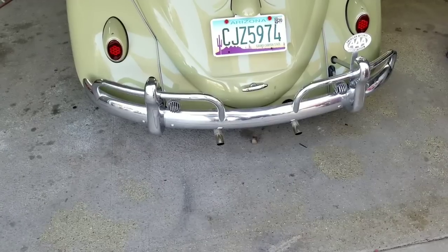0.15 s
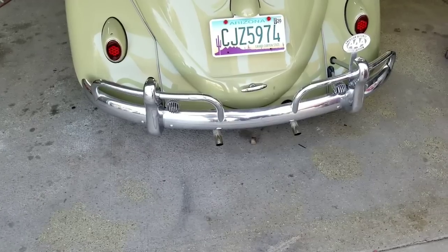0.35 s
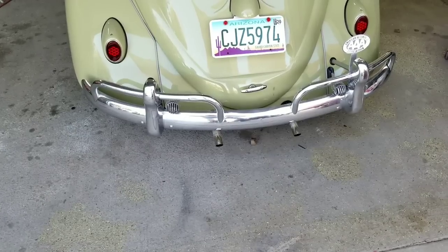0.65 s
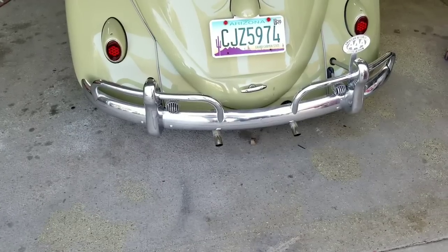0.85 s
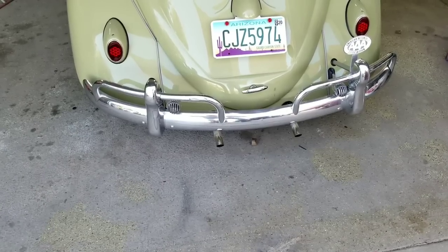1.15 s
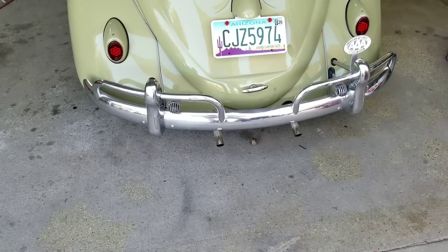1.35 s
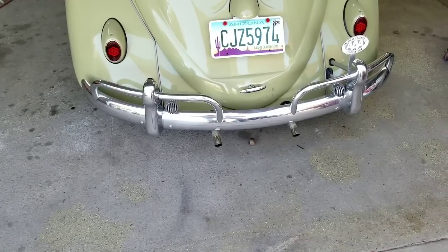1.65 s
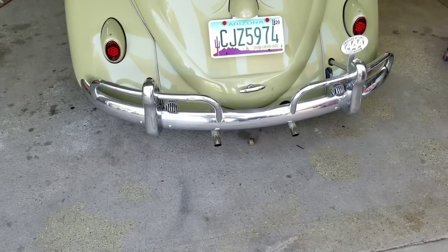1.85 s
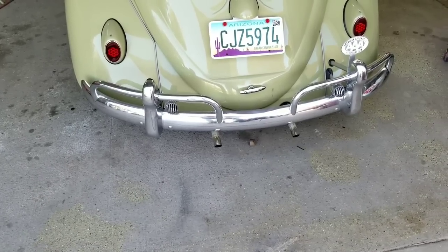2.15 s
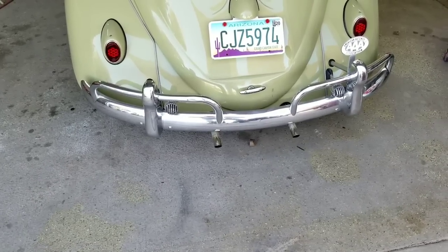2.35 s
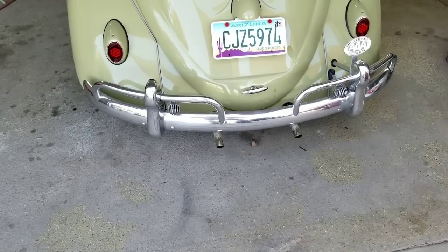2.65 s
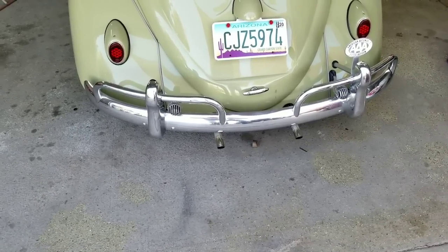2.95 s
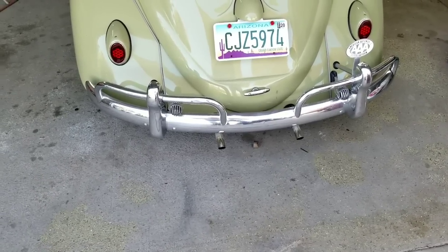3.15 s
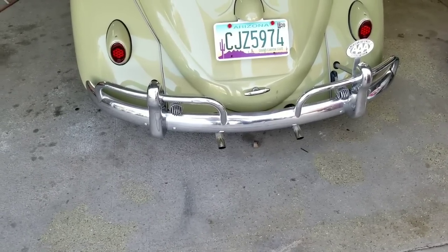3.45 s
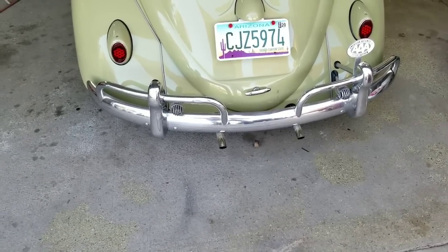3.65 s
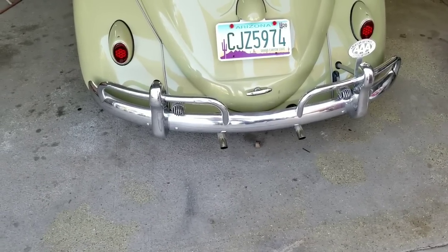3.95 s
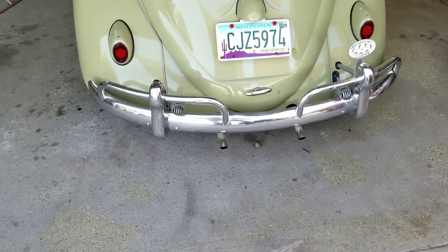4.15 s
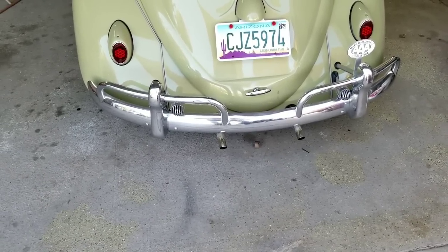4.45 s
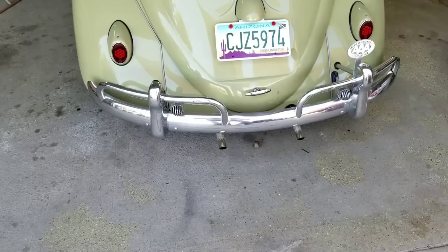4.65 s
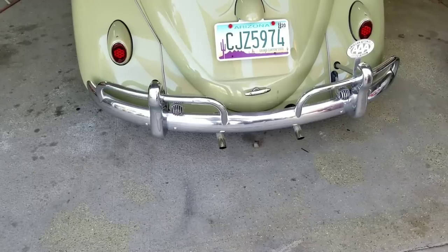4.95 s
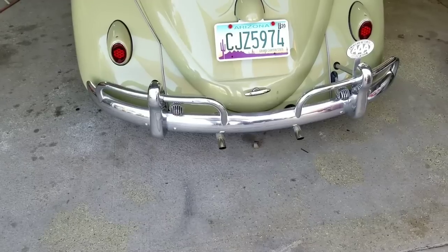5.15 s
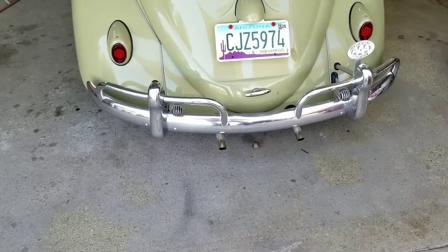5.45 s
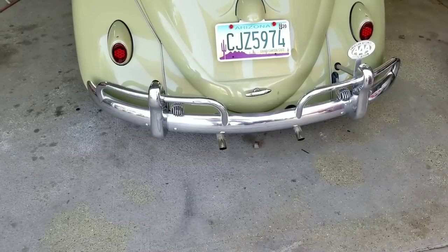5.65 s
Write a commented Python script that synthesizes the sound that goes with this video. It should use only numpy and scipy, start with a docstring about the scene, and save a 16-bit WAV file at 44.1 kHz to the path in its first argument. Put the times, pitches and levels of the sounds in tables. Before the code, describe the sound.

An air-cooled car engine idles in a garage, slows and sputters almost to a stall, coughs once, then catches again unevenly.

```python
"""Flat-four nearly stalling in a garage

An air-cooled engine runs off the throttle, heard from behind its two tailpipes. It slows, misfires,
nearly stalls, coughs once with a hollow pop and catches again unevenly. Every firing is a low thump,
a knock in the silencer and a whistling puff of gas; while it runs evenly the thumps merge into a drone.
The garage answers, and the cooling fan and valve gear rush underneath."""
import sys
import numpy as np
from scipy import signal
from scipy.fft import rfft, irfft, next_fast_len
from scipy.io import wavfile

SR = 44100
rng = np.random.default_rng(int(sys.argv[2]) if len(sys.argv) > 2 else 0)


def persist_wave(psi):
    """Save psi, clipped to +-1, as 16-bit WAV."""
    counts = np.round(np.clip(psi, -1, 1) * 32767).astype(np.int16)
    wavfile.write(sys.argv[1], SR, np.atleast_2d(counts).T)


N = 255320
TIME = np.arange(N) / SR
EVEN_UNTIL_S = 2.57  # the engine runs rough from here on

# engine speed: (time [s], rate [firings/s])
FIRING_RATE = [(0.0, 44.45), (0.39, 42.47), (0.79, 42.92), (1.4, 41.44), (1.88, 37.92), (2.4, 35.76),
               (2.62, 33.61), (2.93, 31.67), (3.46, 29.34), (3.76, 24.8), (4.12, 18.75), (4.42, 13.64),
               (4.5, 18.32), (4.7, 20.36), (4.95, 41.32), (5.02, 48.64), (5.1, 40.4), (5.18, 49.43),
               (5.4, 40.33), (5.61, 35.74), (5.79, 35.88)]
# strength of the burn: (time [s], level [dB])
POWER = [(0, 0), (2.3, 0.5), (3.0, -2), (3.8, -6.5), (4.3, -11), (4.72, -9.5), (4.95, -6), (5.25, -8.5),
         (5.79, -7.5)]


def from_db(db):
    """Decibels to gain."""
    return 10 ** (np.asarray(db) / 20)


def at_hz(points, hz):
    """Read a spectrum on a log-frequency axis."""
    known, values = np.transpose(points)
    return np.interp(np.log(hz + 1e-6), np.log(known), values)


def in_time(rows, at):
    """Read a curve at the given times."""
    return np.interp(at, *np.transpose(rows))


def pan(db):
    """Left and right gains for a level difference."""
    return from_db(np.array([[db], [-db]]) / 2)


def stereo_noise(alike, size=N):
    """White noise whose two sides are partly alike."""
    mid, side = rng.standard_normal((2, size))
    return (np.sqrt(1 + alike) * mid + np.sqrt(1 - alike) * side * [[1], [-1]]) / np.sqrt(2)


def coloured(x, spectrum):
    """Shape a white signal, keeping its power."""
    size = next_fast_len(N + SR // 10)
    gain = from_db(at_hz(spectrum, np.arange(size // 2 + 1) * SR / size))
    return irfft(rfft(x, size) * gain / np.sqrt(np.mean(gain ** 2)), size)[..., :N]


def resonance(x, hz, width_hz):
    """Two-pole resonance, gain 1 at its peak."""
    r = np.exp(-np.pi * width_hz / SR)
    feedback = [1, -2 * r * np.cos(2 * np.pi * hz / SR), r * r]
    return signal.lfilter(np.array([1, 0, -1]) * (1 - r * r) / 2, feedback, x + 1e-18)


def low_ring(spectrum, cutoff_hz=700):
    """The minimum-phase ring of a spectrum, low-passed and scaled to a peak of 1."""
    size = SR // 2
    gain = from_db(at_hz(spectrum, np.arange(size // 2 + 1) * SR / size))
    cepstrum = irfft(np.log(gain), size)
    cepstrum[1:size // 2] *= 2
    cepstrum[size // 2 + 1:] = 0
    ring = irfft(np.exp(rfft(cepstrum)), size)
    ring = signal.sosfilt(signal.butter(2, cutoff_hz, fs=SR, output="sos"), ring)
    return ring / np.abs(ring).max()


def delayed(x, s):
    """The same sound, later."""
    return np.interp(TIME - s, TIME, x, left=0)


def swells(times, gains, rise_s, fall_s):
    """One smooth swell per event: a bell-curve attack and an exponential tail."""
    out = np.zeros(N)
    for s, gain in zip(times, gains):
        near = slice(*np.searchsorted(TIME, [s - 4 * rise_s, s + 10 * fall_s]))
        age = TIME[near] - s
        log_envelope = np.where(age < 0, -.5 * (age / rise_s) ** 2, 1 - np.hypot(1, age / fall_s))
        out[near] += gain * np.exp(log_envelope)
    return out


def clicks(times, gains):
    """One click per event."""
    out = np.zeros(N)
    np.add.at(out, np.clip(np.round(times * SR).astype(int), 0, N - 1), gains)
    return out


def firing_count(start_phase=.614):
    """Firings so far; there are two to each turn of the crank."""
    return start_phase + np.cumsum(in_time(FIRING_RATE, TIME)) / SR


def firings(merged_thump_db=-37, misfire_db=-27, rasp_per_power=0.14):
    """The four cylinders take turns, some missing: times, then thump, knock, rasp and hiss in dB."""
    # the cylinders in firing order:
    # (lag [s], thump [dB], knock [dB], rasp [dB], hiss [dB], knock lost in rough running [dB])
    cylinders = [(.0002, -25.5, -32, -23.5, -18, 13), (.0002, -20.5, -22.5, -25, -21.5, 2.5),
                 (.00015, -21, -29.5, -23.5, -19, 5.5), (-.0006, -21.5, -27.5, -22, -18, 1.5)]
    # gas pressure at the valves, driving knock, rasp and hiss: (time [s], level [dB])
    pressure = [(0, -2.5), (1, -1.4), (1.6, -3), (2.3, -2.5), (2.9, 1), (3.5, -0.5), (3.88, -3), (4.1, -1),
                (4.5, -1), (4.92, 0), (5.18, -1.5), (5.38, -6), (5.79, -7)]
    # charges that burn harder or softer than their neighbours: (time [s], knock [dB], rasp [dB], hiss [dB])
    odd_burns = [(2.352, -7, 0, 3.5), (2.582, -4, -11, -13), (2.734, 1, -1.5, 4), (3.443, -8, 0, 6.5),
                 (3.478, -9, -1, 5.5), (3.584, 0, -2, 8.5), (3.814, -6, -2, -4), (3.95, 2, -7.5, -4.5),
                 (3.996, -8, 2.5, -0.5), (4.327, 1, 3.5, -3.5), (4.466, -11, 3.5, 1), (4.895, 5, 2.5, 2),
                 (4.946, 5, 5, 5), (5.171, 11, 1, 6), (5.211, 0, -6, -2), (5.391, -4, -4.5, -6)]
    # the mixture fails to light: (time [s], misses in a row [firings])
    misfires = [(2.83, 1), (3.01, 1), (3.08, 1), (3.27, 1), (3.34, 1), (3.55, 1), (3.62, 1), (3.77, 1),
                (3.9, 1), (4.05, 1), (4.15, 3), (4.39, 1), (4.57, 2), (5.06, 3), (5.23, 1), (5.28, 5),
                (5.52, 1), (5.57, 1)]
    beats = TIME[np.flatnonzero(np.diff(np.floor(firing_count())))]
    turn = np.arange(len(beats)) % len(cylinders)
    lag, thump, knock, rasp, hiss, knock_loss = np.array(cylinders)[turn].T
    rough = beats > EVEN_UNTIL_S
    power = in_time(POWER, beats)
    thump = np.where(rough, thump + power, merged_thump_db)
    rasp = rasp + rasp_per_power * power  # a weak burn rasps less
    gas = np.transpose([knock - rough * knock_loss, rasp, hiss]) + in_time(pressure, beats)[:, None]
    gas += rng.standard_normal(gas.shape) * (1.54, 1.56, 0.7)  # no two burns are alike
    for s, *change_db in odd_burns:
        gas[np.abs(beats - s).argmin()] += change_db
    levels = np.column_stack([thump, gas])
    for s, count in misfires:
        first = np.abs(beats - s).argmin()
        levels[first:first + count] += misfire_db  # an unlit cylinder only pumps air
    return beats + lag, *levels.T


def drone(bass_lead_rad=11):
    """Even firing feeds the exhaust's standing waves; each crank order swells as it slides through one."""
    # standing waves of the exhaust: (frequency [Hz], level [dB])
    standing_waves = [(35, -33), (44, -35), (68, -36.5), (84, -25), (104, -25), (115, -32), (128, -29),
                      (137, -33), (150, -30), (170, -32), (190, -36.5), (260, -39.5)]
    # harmonics of even firing: (order [multiple of crank speed], level [dB])
    crank_orders = [(2, 0), (3, -7), (4, -0.5), (6, 0.5), (7, -1), (8, -0.5), (10, -3.5), (12, -4)]
    crank_angle = np.pi * firing_count()
    crank_hz = in_time(FIRING_RATE, TIME) / 2
    out = 0
    for order, db in crank_orders:
        gain = from_db(db + at_hz(standing_waves, order * crank_hz))
        out = out - gain * np.cos(order * crank_angle + bass_lead_rad / order ** 2)  # low orders lead
    # the waves die away as the running turns rough
    return out * np.exp(-np.maximum(TIME - EVEN_UNTIL_S, 0) / 0.023)


def thumps(times, level_db, lead_s=0.00667, boom_db=5, header_drive_db=40):
    """Each slug of gas swings the silencer's air; every second one also rings a long header pipe."""
    # the silencer's boom with the garage's lowest modes: (frequency [Hz], level [dB])
    boom = [(20, -40), (42, -1.5), (60, 3), (73, -1.5), (86, 4), (102, 2), (115, -4.5), (130, -8),
            (150, -1.5), (174, -9), (205, -13), (258, -19), (360, -24.5), (700, -43.5)]
    push = clicks(times - lead_s, from_db(level_db + boom_db))
    header_push = clicks(times[1::2] - lead_s, from_db(level_db[1::2] + header_drive_db))
    header = resonance(header_push, hz=150, width_hz=18)
    return signal.fftconvolve(push, low_ring(boom))[:N] + header


def knocks(times, level_db, lead_s=0.004548, front_db=39, gush_db=12):
    """The valve opens: a pressure front and a short gush ring the silencer ahead of the puff."""
    # silencer modes: (frequency [Hz], width [Hz], level [dB], left minus right [dB])
    silencer = [(750, 530, -19.5, 9), (916, 204, -8.5, 6), (1174, 220, 1.5, -7), (1315, 380, -4, -7.5)]
    front = clicks(times - lead_s, from_db(level_db + front_db))
    gush = swells(times - lead_s, from_db(level_db + gush_db), rise_s=0.00078, fall_s=0.0067)
    strike = front + gush * stereo_noise(alike=0.91)
    return sum((-1) ** k * from_db(db) * pan(side_db) * resonance(strike, hz, width)
               for k, (hz, width, db, side_db) in enumerate(silencer))


def puffs(times, rasp_db, hiss_db, rasp_lead_s=0.00081):
    """Gas rasps through the whole pulse and hisses at its fastest; the tailpipes whistle with both."""
    # colour of the rasp before the pipes: (frequency [Hz], density [dB])
    rasp_colour = [(300, -13.5), (700, -10.5), (1200, -1.5), (1800, -9.5), (2600, 2), (3300, -6.5),
                   (4600, -0.5), (6300, -4), (9000, 0), (15000, -9.5)]
    # colour of the hiss before the pipes: (frequency [Hz], density [dB])
    hiss_colour = [(2000, -38), (5000, -34), (7500, -12), (9500, -4.5), (11000, 2.5), (12500, -0.5),
                   (14500, -2), (16000, -3)]
    # tailpipe resonances: (frequency [Hz], width [Hz], boost [dB], left minus right [dB])
    pipes = [(2660, 1400, 3.5, 2), (3502, 92, -3, 28), (4200, 210, 2, -3.5), (4540, 130, 5, -2),
             (4787, 147, 9, 5.5), (5606, 180, 7, -3), (6890, 184, 3.5, 21), (7920, 113, 7, -2.5),
             (9120, 260, 1, 9), (11350, 820, 5, 2.5), (12930, 870, 3.5, 16), (13700, 900, 5, -5.5)]
    rasp = swells(times - rasp_lead_s, from_db(rasp_db - 1), rise_s=0.0023, fall_s=0.0055)
    hiss = swells(times, from_db(hiss_db), rise_s=0.0027, fall_s=0.0021)
    gas = coloured(rasp * stereo_noise(alike=0.14), rasp_colour)
    gas += coloured(hiss * stereo_noise(alike=0.58), hiss_colour)
    # every puff drives each resonance with a strength of its own, more so in rough running
    puff_spread_db = np.where(times < EVEN_UNTIL_S, 2.8, 4.2)
    for hz, width, boost_db, side_db in pipes:
        spread_db = puff_spread_db * min(1, 400 / width)  # broad resonances average the eddies out
        chance_db = np.interp(TIME, times, spread_db * np.sqrt(3) * rng.uniform(-1, 1, len(times)))
        peak_gain = from_db(boost_db + chance_db) * pan(side_db)
        gas = gas + (peak_gain - 1) * resonance(gas, hz, width)
    return gas


def cough(glide=0.095):
    """Unburnt mixture lights in the exhaust and drives one hollow, rising note; two walls throw it back."""
    # the pop in the exhaust: (time [s], length [s], mid pitch [Hz], level [dB])
    pops = [(4.452, 0.028, 368.7, -13.5)]
    # its partials: (ratio [multiple of the pitch], level [dB])
    partials = [(1, 1), (1.27, -16), (2.2, -23), (2.75, -40)]
    pop = np.zeros(N)
    for s, length, hz, db in pops:
        progress = np.clip((TIME - s) / length, 0, 1)
        phase = 2 * np.pi * hz * length * progress * (1 + glide * (progress - 1))
        note = sum(from_db(partial_db) * np.sin(ratio * phase) for ratio, partial_db in partials)
        breath = from_db(-3) * resonance(rng.standard_normal(N), hz=645, width_hz=410)
        pop += from_db(db) * np.sin(np.pi * progress) * (note + breath)
    echoed = pop + from_db(-8.5) * delayed(pop, s=0.02) + from_db(-13.5) * delayed(pop, s=0.061)
    return echoed * pan(db=3) + from_db(-14.5) * garage(echoed, alike=0.82, build_s=0.019)


def machinery(full_db=-28, full_firings_per_s=43.5, db_per_octave=6.5):
    """The cooling fan and the valve gear rush under the exhaust, louder with speed and power."""
    # colour of the rush: (frequency [Hz], density [dB])
    rush_colour = [(20, -6), (45, 0), (100, 0), (200, 1), (320, -1), (500, -11), (620, -6), (900, -3),
                   (1800, -8), (4500, -7), (8000, -13), (15000, -13)]
    octaves = np.log2(in_time(FIRING_RATE, TIME) / full_firings_per_s)
    level_db = full_db + db_per_octave * octaves + in_time(POWER, TIME)
    return from_db(level_db) * coloured(stereo_noise(alike=0.61), rush_colour)


def garage(x, alike, build_s):
    """Diffuse reflections build up and die band by band, in a tail of unit energy per side."""
    # garage reverberation: (frequency [Hz], time to fall 60 dB [s])
    decay_times = [(100, 0.67), (400, 0.36), (1200, 0.19), (4000, 0.24), (8000, 0.14), (14000, 0.22)]
    age = TIME[:SR // 2]
    white = stereo_noise(alike, size=len(age))
    edges_hz = np.geomspace(40, 18000, 9)
    tail = 0
    for low, high in zip(edges_hz, edges_hz[1:]):
        band = signal.sosfiltfilt(signal.butter(2, [low, high], "band", fs=SR, output="sos"), white)
        tail = tail + band * from_db(-60 * age / at_hz(decay_times, np.sqrt(low * high)))
    tail *= 1 - np.exp(-(age / build_s) ** 2)
    tail /= np.sqrt(np.sum(tail ** 2) / 2)
    return signal.fftconvolve(np.atleast_2d(x), tail, axes=1)[:, :N]


def scene():
    """The exhaust's low and bright layers, their reverberation and the machinery behind them."""
    times, thump_db, knock_db, rasp_db, hiss_db = firings()
    low = thumps(times, thump_db)
    low_room = from_db(-17) * garage(low, alike=.9, build_s=.02)
    bright = knocks(times, knock_db) + puffs(times, rasp_db, hiss_db) * pan(db=-2)
    bright_room = from_db(-7) * garage(bright, alike=0.039, build_s=0.0033)
    return drone() + low + low_room + bright + bright_room + cough() + machinery()


def record(dry, low_cut_hz=18, high_cut_hz=14650):
    """The microphone sheds the deepest bass, peaks are rounded, the top is cut steeply."""
    low_cut = signal.butter(1, low_cut_hz, "high", fs=SR, output="sos")
    high_cut = signal.ellip(12, .2, 80, high_cut_hz, fs=SR, output="sos")
    rounded = np.tanh(signal.sosfilt(low_cut, dry))
    return signal.sosfilt(high_cut, rounded)


dry = scene()
out = record(dry)
persist_wave(out)
```